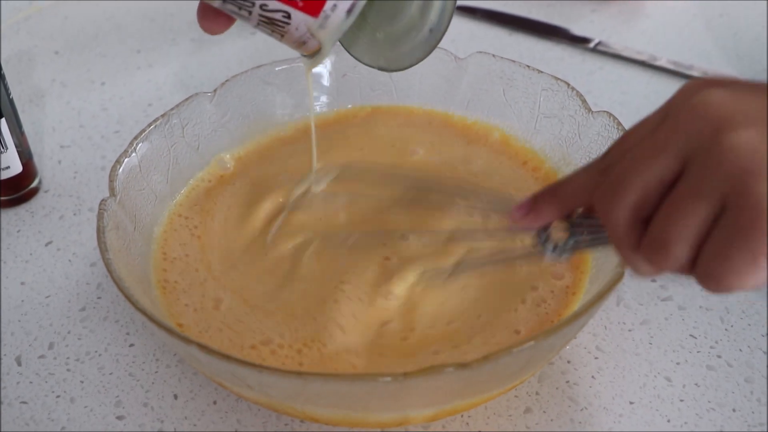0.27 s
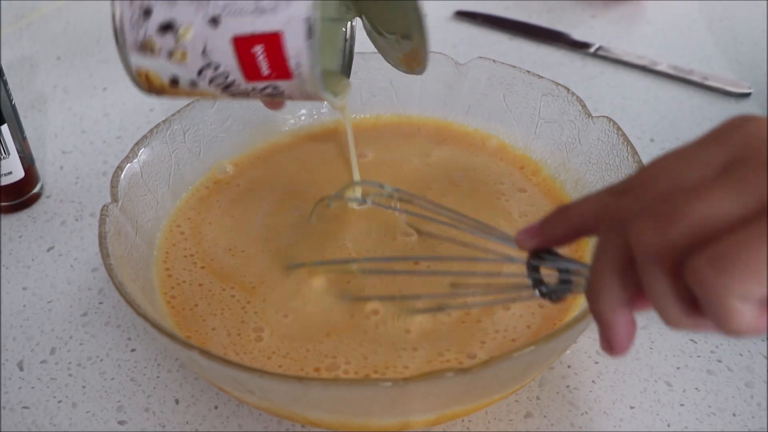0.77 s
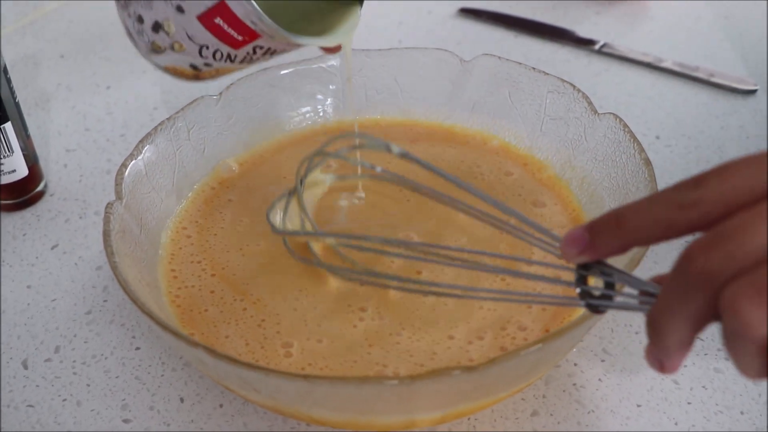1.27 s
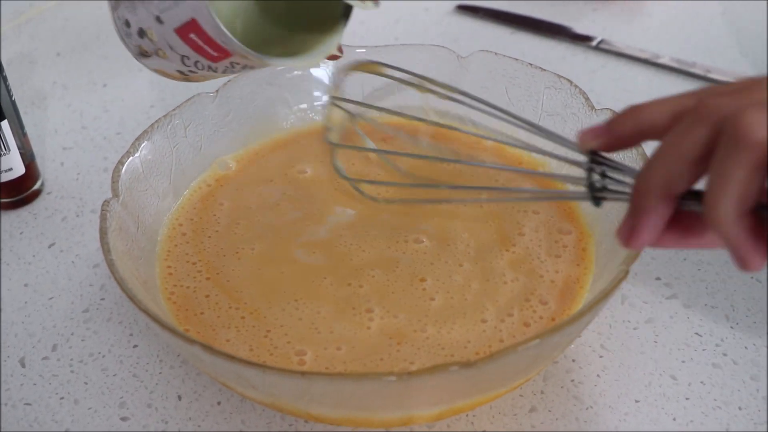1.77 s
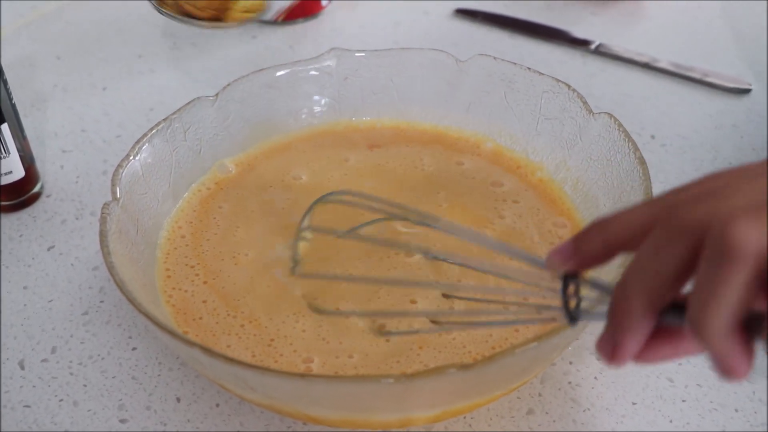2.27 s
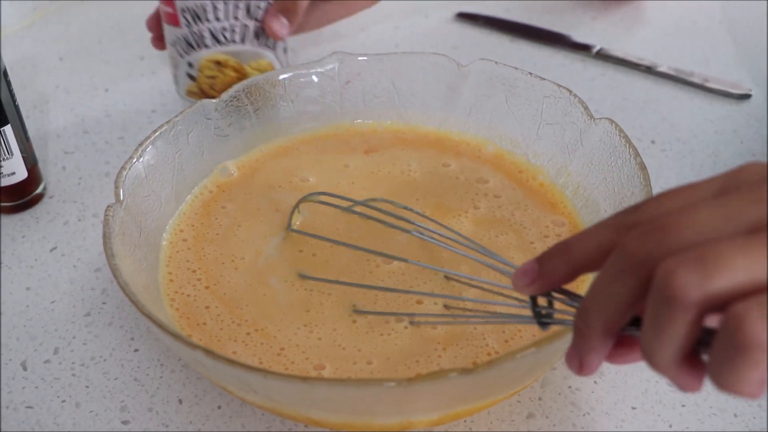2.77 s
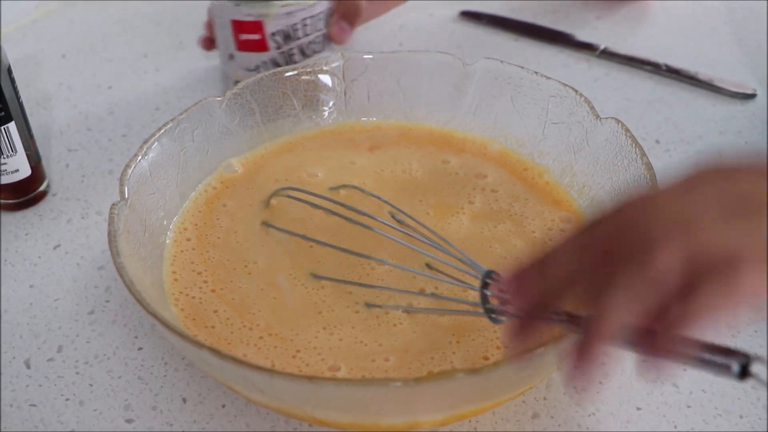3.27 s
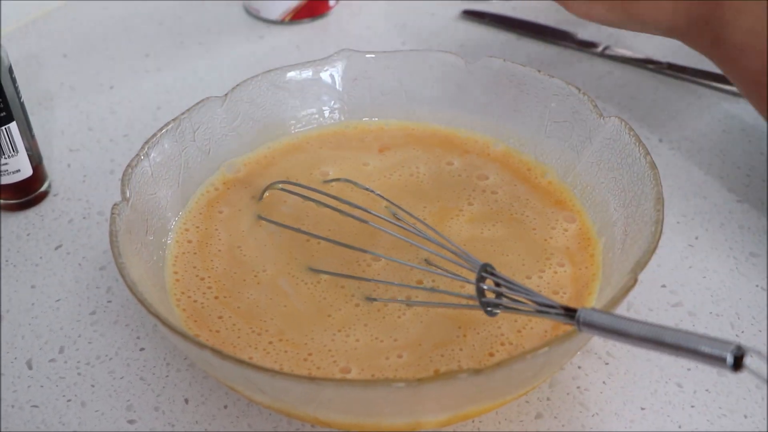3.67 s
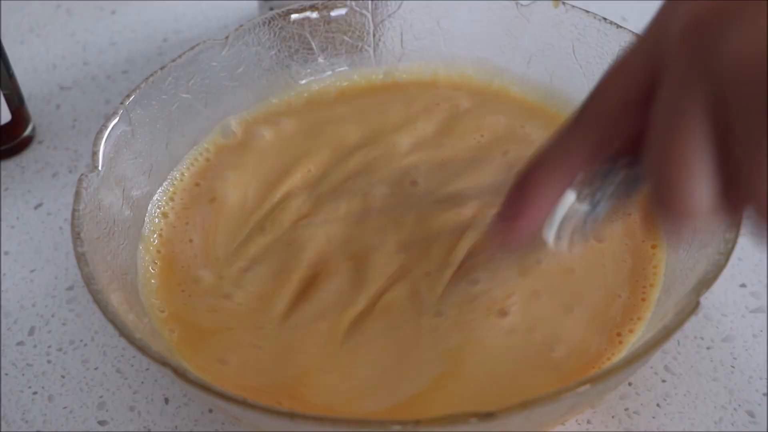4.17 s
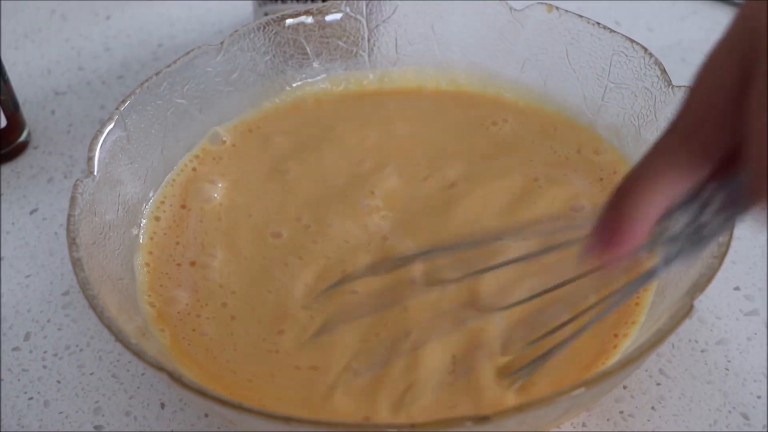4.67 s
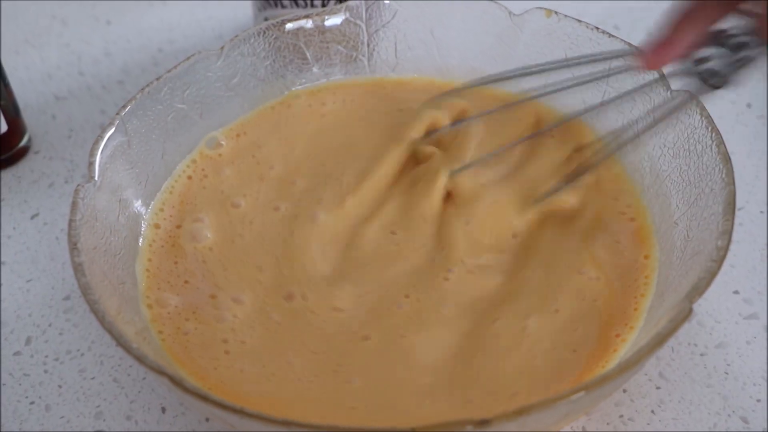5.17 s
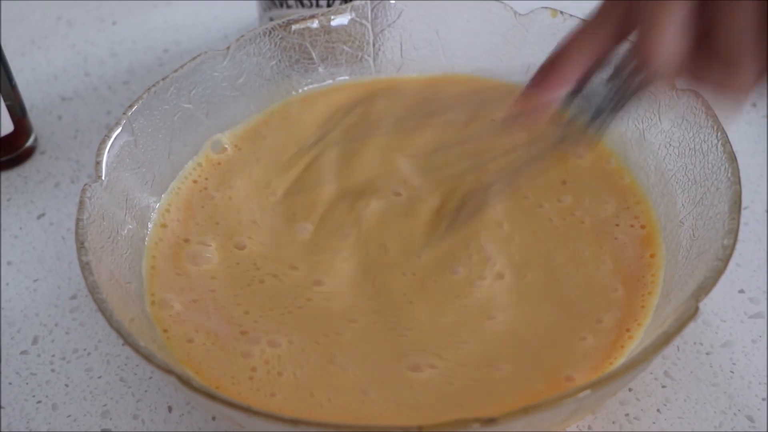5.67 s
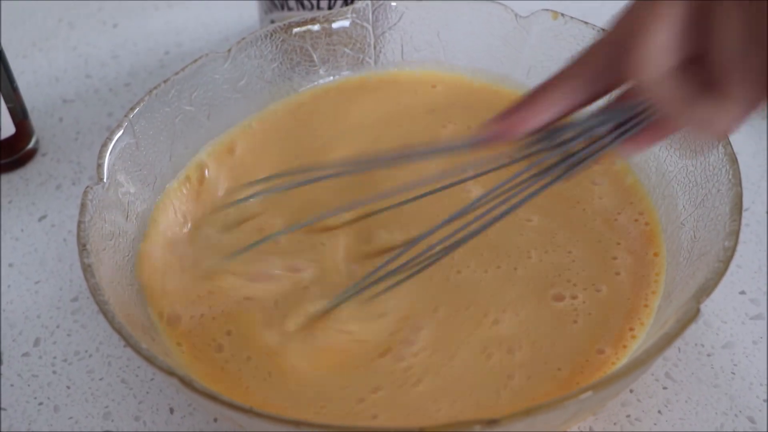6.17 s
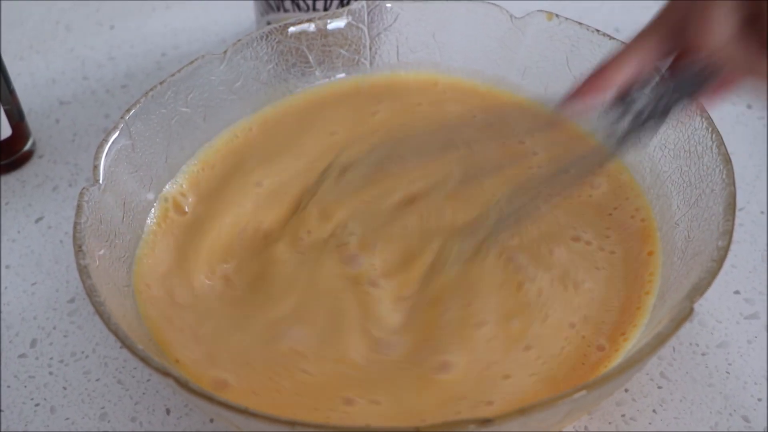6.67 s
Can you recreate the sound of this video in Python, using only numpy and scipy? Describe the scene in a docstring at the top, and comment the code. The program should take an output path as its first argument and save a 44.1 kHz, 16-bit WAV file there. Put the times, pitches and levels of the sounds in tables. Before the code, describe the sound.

A wire whisk ticks lightly around a glass bowl of liquid, close to a hand-held microphone in a kitchen. A can strikes the rim with a loud clink, a low handling thump follows, and the can rocks on the stone counter as the whisk is laid down. After a brief silence, brisk whisking rattles on the glass while the mixture sloshes and fizzes. A faint appliance hum lies underneath.

```python
"""A wire whisk ticks slowly round a glass bowl of eggs and condensed milk, close to a hand-held camera.
A can knocks the bowl and rocks on the stone counter, a little further off; the whisk is laid on the rim.
After a short silence comes brisk whisking: the wires rattle over the glass in runs of tiny slips,
the bowl thuds on the counter, and the mixture sloshes and fizzes as its bubbles ring.
Handling rumble, a faint appliance hum and the short echo of the kitchen lie underneath."""
import sys
import numpy as np
from scipy import signal
from scipy.fft import rfft, irfft
from scipy.io import wavfile

SR = 44100
rng = np.random.default_rng(int(sys.argv[2]) if len(sys.argv) > 2 else 0)


def digitize_waveform(pressure):
    """Quantize a signal to 16-bit integers and store it at the path in sys.argv[1].

    Rows of a 2-D input are taken as channels; values are limited to [-1, 1].
    """
    field = np.atleast_2d(pressure).T
    bounded = np.clip(field, -1, 1)
    quanta = np.round(bounded * 32767).astype(np.int16)
    wavfile.write(sys.argv[1], SR, quanta)


N = 305613

# Modes of the glass bowl, lowest first. Each row: pitch in Hz, relative level in dB, t60 in seconds.
GLASS_MODES = [(394.3, -16.5, 0.3), (781, 0.5, 0.25), (1007, 1.5, 0.23), (1760, 1.5, 0.27),
               (2680, -11.5, 0.2), (3720, -27, 0.37), (4890, -12.5, 0.065), (5000, -27.5, 0.19),
               (6330, -24.5, .11), (7980, -22, 0.12), (9650, -32.5, .14), (11200, -36, .08)]
# How alike the two microphones hear the scene. Each row: frequency in Hz, coherence from 0 to 1.
MIC_COHERENCE = [(130, 0.94), (500, 0.59), (1300, 0.47), (3000, 0.099), (12000, 0.03)]
RAP_S = 0.0049  # a plain rap of wire on glass; a longer contact is a drag


def amp(db):
    """Decibels to gain."""
    return 10 ** (np.asarray(db) / 20)


def unit(x):
    """Scales to rms 1."""
    return x / np.sqrt(np.mean(x ** 2) + 1e-20)


def sized(x, db):
    """Gives a sound the energy of 20 ms at this level."""
    return amp(db) * unit(x) * np.sqrt(.02 * SR / x.shape[-1])


def clock(size):
    """Times in seconds of so many samples."""
    return np.arange(size) / SR


def read(points, hz):
    """Reads a table on a log-frequency axis."""
    knots_hz, values = np.transpose(points)
    return np.interp(np.log(hz + 1), np.log(knots_hz + 1), values)


def follow(rows, column=1):
    """Gain over the whole scene from rows of seconds and dB."""
    rows = np.array(rows)
    return amp(np.interp(clock(N), rows[:, 0], rows[:, column]))


def smooth(x, seconds):
    """One-pole average with this time constant."""
    keep = np.exp(-1 / (seconds * SR))
    return signal.lfilter([1 - keep], [1, -keep], x)


def add(mix, start, sound):
    """Mixes a sound in at a start in seconds."""
    part = mix[:, max(round(start * SR), 0):][:, :sound.shape[-1]]
    part += sound[..., :part.shape[1]]


def noise(spectrum, size):
    """Noise shaped by rows of Hz and dB, alike at the two microphones in the bass."""
    hz = np.fft.rfftfreq(size, 1 / SR)
    left, other = rfft(rng.standard_normal((2, size)))
    coherence = read(MIC_COHERENCE, hz)
    right = coherence * left + np.sqrt(1 - coherence ** 2) * other
    return unit(irfft(np.array([left, right]) * amp(read(spectrum, hz)), size))


def colour(x, spectrum):
    """Minimum-phase filter shaped by rows of Hz and dB."""
    log_gain = np.log(amp(read(spectrum, abs(np.fft.fftfreq(2048, 1 / SR)))))
    taps = np.fft.ifft(np.exp(np.conj(signal.hilbert(log_gain)))).real[:1024]
    return signal.fftconvolve(x, taps[None], axes=1)[:, :x.shape[1]]


def ring(modes, size, pitch=1, scatter_db=0):
    """Dying modes; the higher ones reach the two microphones out of step."""
    hz, db, t60 = np.transpose(modes)[:, :, None]
    height, lag = rng.standard_normal((2, 2, len(modes), 1))
    phase = lag * np.sqrt(-np.log(read(MIC_COHERENCE, hz)))
    t = clock(size)
    fade = amp(db + scatter_db * height - 60 * t / t60)
    return (fade * np.sin(2 * np.pi * hz * pitch * t + phase)).sum(1)


def room_tone():
    """Still kitchen air and the faint hum of an appliance, drifting slowly in phase."""
    # The air. Each row: frequency in Hz, relative level in dB.
    air_spectrum = [(25, -18), (70, 3), (130, 1), (200, -7), (330, -2.5), (700, -10.5), (2000, -15.5),
                    (6000, -20.5), (15000, -29.5)]
    # The hum. Each row: pitch in Hz, level in dB.
    hum_tones = [(129.2, -62), (518, -62)]
    t, hum = clock(N), np.zeros(N)
    for hz, db in hum_tones:
        drift = 0.49 * rng.standard_normal() * np.sin(t)
        hum += amp(db) * unit(np.sin(2 * np.pi * hz * t + drift))
    return amp(-50) * noise(air_spectrum, N) + hum


def thump(hz, length, decay, size):
    """A soft push rings the counter and the camera body in a low band."""
    t = clock(size)
    band = [(hz / 5, -38), (hz / 2, -19), (hz * 0.79, 0), (hz, -6),
            (hz * 1.38, -9), (hz * 5, -28), (hz * 80, -66)]
    envelope = (1 - np.exp(-t / 0.0022)) * np.exp(-np.maximum(t - length, 0) / decay)
    return noise(band, size) * envelope


def rumble_and_thumps():
    """The camera sways in the hand with a rumble and a soft rustle; dull low thumps sound over it."""
    # The sway. Each row: time in seconds, level of rumble and rustle in dB.
    sway = [(0, -57), (1.1, -61.5), (1.47, -44), (1.8, -56.5), (3.5, -73.5), (4.2, -57.5)]
    # The rustle. Each row: frequency in Hz, relative level in dB.
    rustle_spectrum = [(200, -14.5), (800, 3.5), (2000, -2), (6000, -15), (16000, -37)]
    # Dull low thumps from camera handling, the can's knock and the bowl bouncing on the counter.
    # Each row: start in seconds, time before the decay in seconds, level in dB.
    thumps = [(0.492, 0.03, -34.5), (0.94, 0.0074, -27.5), (1.401, 0.069, -33), (2.004, 0.1, -9.5),
              (2.807, 0.091, -27.5), (5.928, 0.014, -26)]
    rumble = noise([(10, -11.0), (30, -7.5), (100, -18.5), (400, -69)], N)
    out = follow(sway) * (rumble + noise(rustle_spectrum, N))
    for start, length, db in thumps:
        add(out, start, sized(thump(hz=136.5, length=length, decay=0.059, size=14000), db))
    return out


def scrape(body, length, slips_per_s, bite=1):
    """A contact is a first bite and a run of tiny slips, each of which sounds the body."""
    t = clock(size=2560)
    chance, force = rng.random(len(t)), rng.standard_normal(len(t))
    pressure = np.sin(np.pi * np.minimum(t / length, 1))
    slips = force * (chance < slips_per_s / SR) * pressure
    slips[0] = bite
    return signal.fftconvolve(body, slips[None], axes=1)


def wire_contact(length, rattle_db, clack_db):
    """One wire on the wet glass: the loops rattle and the damped bowl clacks."""
    # Modes of the wire loops. Each row: pitch in Hz, relative level in dB, t60 in seconds.
    wire_modes = [(1280, 4.5, 0.03), (1400, 0.5, 0.041), (1980, -14.5, 0.11), (2680, 1.5, 0.01),
                  (3030, 0, 0.011), (3730, 0, 0.025), (5147, 7.5, 0.014), (5990, 2.5, 0.025)]
    # The bright rattle and the duller clack. Each row: frequency in Hz, relative gain in dB.
    rattle_spectrum = [(1500, -40.5), (2500, -16.5), (3400, 4), (6800, -7), (8200, -2.5), (12000, -11),
                       (16000, -18.5)]
    clack_spectrum = [(150, -22), (800, -11.5), (1250, -3), (1600, -2.5), (2200, 5), (3300, 0), (6000, -68)]
    t = clock(size=2560)
    snap = np.exp(-t / 0.0015) + 0.22 * np.exp(-t / 0.014)
    tick = noise([(100, 0.014), (16000, 0.0042)], len(t)) * snap
    loops = ring(wire_modes, len(t), pitch=1 + 0.026 * rng.standard_normal(), scatter_db=4.5)
    contact = scrape(sized(tick, 0) + sized(loops, -6), length, slips_per_s=3000,
                     bite=3.15 * RAP_S / length)
    rattle = sized(colour(contact, rattle_spectrum), rattle_db)
    clack = sized(colour(contact, clack_spectrum), clack_db)
    return rattle + clack


def bowl_bounce(db, size=12000):
    """The bowl thuds on the counter, at a new pitch each time, and its lowest mode rings on faintly."""
    # Modes of the bowl on the stone. Each row: pitch in Hz, relative level in dB, t60 in seconds.
    bounce_modes = [(116, 1.5, 0.22), (264.3, -4.5, 0.19)]
    detune, height = rng.standard_normal(2)
    onset = 1 - np.exp(-clock(size) / 0.00037)
    rock = onset * ring(bounce_modes, size, pitch=2 ** (0.13 * detune))
    deep = onset * ring(GLASS_MODES[:1], size, pitch=1 - 0.013 * abs(detune))
    thud = thump(hz=134, length=0.0066, decay=0.038, size=size)
    return sized(rock, db) + sized(thud, db - 7.5) + sized(deep, db - 21.5 - 0.5 * height)


def whisk(rattle_trim_db=-15, clack_trim_db=-2.5):
    """Each stroke lands the loops on the glass and bounces the bowl; light flicks fall between."""
    # The strokes. Each row: time in seconds, relative levels of rattle and of clack in dB.
    strokes = [(0.0569, -25.5, -38), (0.1393, -40, -39), (0.191, -30.5, -45), (0.3248, -27.5, -37.5),
               (0.5666, -30, -36), (0.651, -34.5, -40), (4.2035, -23.5, -37.5), (4.333, -28, -40),
               (4.3922, -28, -37), (4.5457, -17, -35), (4.6512, -18, -34), (4.7635, -28.5, -56),
               (4.8541, -22, -29.5), (4.9383, -26, -33), (5.0468, -25, -34), (5.0681, -17.5, -29.5),
               (5.1922, -14, -29), (5.2629, -15, -24), (5.3945, -17, -28.5), (5.5657, -19.5, -23.5),
               (5.7105, -20.5, -28.5), (5.7657, -27.5, -39), (5.8519, -23.5, -33), (5.9359, -21, -32),
               (6.0245, -13.5, -23), (6.15, -25, -35), (6.201, -20.5, -36), (6.2604, -13.5, -26),
               (6.4319, -26.5, -36), (6.5729, -28.5, -38.5), (6.6717, -29.5, -41)]
    # The wires drag when the whisk lies flat and rebound when it is beaten.
    # Each row: time in seconds, contact length in seconds.
    drag = [(0.3, 0.005), (0.57, 0.0036), (4.2, .02), (4.9, 0.017), (5.05, 0.0075), (5.57, .006),
            (6.26, 0.0056), (6.43, 0.014)]
    # The whisk presses the bowl down. Each row: time in seconds, bounce against clack in dB.
    press = [(0.7, -25), (4.2, -2.5), (5.3, -4.5), (5.95, -2), (6.26, -9), (6.5, 5.5)]
    # A single loop flicks the glass. Each row: start in seconds, relative level in dB.
    flicks = [(4.229, -27), (4.43, -22), (4.8225, -27.5), (4.974, -23.5), (5.286, -19.5), (5.428, -30),
              (5.601, -24), (5.6898, -26.5), (5.9862, -25.5), (6.068, -21.5), (6.374, -26), (6.4715, -21)]
    out = np.zeros((2, N))
    for time, rattle_db, clack_db in strokes:
        length = np.interp(time, *np.transpose(drag))
        press_db = np.interp(time, *np.transpose(press))
        drag_db = 2 * np.log2(length / RAP_S)  # a longer contact carries more energy
        rattle_db += rattle_trim_db + drag_db
        clack_db += clack_trim_db + .5 * drag_db
        start = time - .3 * (length - RAP_S)  # and begins a little early
        add(out, start, wire_contact(length, rattle_db, clack_db))
        add(out, start, bowl_bounce(clack_db + press_db))
    for start, db in flicks:
        add(out, start, amp(rattle_trim_db) * wire_contact(length=0.003, rattle_db=db, clack_db=db - 9))
    return out


def froth(beating, grains_per_s=2500, splash_db=-14, surge_db=5.0):
    """Tiny bubbles crackle in surges as the mixture churns, and in the wake of each stroke and slosh."""
    # The churning. Each row: time in seconds, fizz level in dB about which it surges.
    churn = [(0.35, -64), (1.0, -56), (3.9, -66.5), (4.17, -45), (4.8, -56.5), (5.5, -63), (6.92, -43)]
    # The fizz. Each row: frequency in Hz, relative gain in dB.
    fizz_spectrum = [(150, 7), (400, -17), (800, 0), (1400, 0), (4500, 0), (8000, -8.5), (16000, -22.5)]
    bursts = rng.random((2, N)) < grains_per_s / SR
    strength = amp(3.2 * np.minimum(rng.exponential(1, (2, N)), 4))
    grains = bursts * strength * rng.choice([-1, 1], (2, N))
    fizz = unit(colour(grains + 0.12 * grains[::-1], fizz_spectrum))  # some spill between microphones
    wake = np.sqrt(smooth((beating ** 2).mean(0) + 1e-14, seconds=0.028))
    knots = np.arange(0, N / SR, .02)
    surge = amp(surge_db * np.interp(clock(N), knots, rng.standard_normal(len(knots))))
    return (follow(churn) + amp(splash_db) * wake) * surge * fizz


def squeaks():
    """Light rubbing squeaks softly, swelling and fading, while can and whisk are moved about."""
    # The rubs. Each row: start in seconds, length in seconds, level in dB, factor on the pitch.
    rubs = [(0.675, 0.26, -38, 1), (2.201, 0.23, -36.5, 0.94), (2.47, 0.097, -42.5, 0.79)]
    # Their squeak. Each row: frequency in Hz, relative level in dB.
    squeak_spectrum = [(1400, -19.5), (2120, -2.5), (2500, -11), (3800, -21.5), (5600, -15), (7500, -25.5),
                       (16000, -38.5)]
    out = np.zeros((2, N))
    for start, length, db, pitch in rubs:
        swell = np.sqrt(np.hanning(int(length * SR)))
        squeak = noise([(hz * pitch, level) for hz, level in squeak_spectrum], size=16384)
        add(out, start, sized(squeak[:, :len(swell)] * swell, db))
    return out


def crack(size, decay):
    """The burst of noise in the first instant of a hard blow."""
    # The burst. Each row: frequency in Hz, relative level in dB.
    crack_spectrum = [(100, -18), (350, -9.5), (1300, 4), (2200, -11.5), (8000, -33.5), (16000, -51)]
    return noise(crack_spectrum, size) * np.exp(-clock(size) / decay)


def rim_clinks(size=14000, settle_s=3.388):
    """Can and whisk handle strike the rim; light steel wakes the higher modes of the glass."""
    # Metal on the rim. Each row: start in seconds, level in dB, treble tilt in dB,
    # contact length in seconds, time constant in seconds with which the resting steel mutes the glass.
    clinks = [(0.9377, -5.5, 3.5, 0.00021, 0.4), (2.33, -31.5, 21.5, 0.0068, 0.034),
              (2.422, -42.5, 23, 0.0032, 0.06), (2.752, -37, 24.5, 0.0059, 0.028),
              (3.387, -27, 10.5, 0.0054, 0.016), (3.395, -31, 14, 0.006, 0.008)]
    out = np.zeros((2, N))
    for start, db, bright_db, length, mute_s in clinks:
        glass = sized(ring(GLASS_MODES, size), 0)
        impact = sized(crack(size, decay=0.005), 1.5 + 0.8 * db)  # a harder blow cracks more
        blow = (glass + impact) * np.exp(-clock(size) / mute_s)
        tilt = [(600, -.5 * bright_db), (1750, 0), (5000, bright_db)]
        add(out, start, sized(colour(scrape(blow, length, slips_per_s=600), tilt), db))
    # The weight of the whisk comes down, rocks the bowl and wakes its lowest mode.
    add(out, settle_s, bowl_bounce(db=-31.5) + sized(ring(GLASS_MODES[:1], size=12000), db=-30.5))
    return out


def can():
    """The empty can knocks the bowl, lands and rocks on the stone, and hisses and rings as it slides."""
    # Modes of the tin. Each row: pitch in Hz, relative level in dB, t60 in seconds.
    tin_modes = [(755, 2.5, 0.066), (774, -1.5, 0.062), (1071, -16, 0.049), (1211, 2.5, 0.023),
                 (2310, -8.5, 0.035), (3550, -22.5, 0.034)]
    # The knocks. Each row: start in seconds, level of the ring in dB, factor on the pitch.
    knocks = [(0.9378, -19, 1.3), (3.029, -7.5, 1.01), (3.0986, -14.5, 1.112), (3.3, -32.5, 1.116)]
    # The slide. Each row: time in seconds, relative levels of hiss and of ringing tin in dB.
    slide = [(2.85, -54, -62), (2.921, -41, -46), (3.01, -58, -73), (3.155, -59, -32.5), (3.203, -33, -48),
             (3.29, -40.5, -29), (3.381, -47, -41.5)]
    out = np.zeros((2, N))
    for start, db, pitch in knocks:
        tin = sized(ring(tin_modes, 8192, pitch), db)
        add(out, start, tin + sized(crack(8192, decay=0.0027), db - 5))
    start, end = slide[0][0], slide[-1][0]
    contact = np.interp(clock(N), [start, start + 0.018, end - .02, end], [0, 1, 1, 0])
    friction = rng.standard_normal((1, N))
    drone = unit(signal.fftconvolve(friction, ring(tin_modes, 4700, pitch=1.11), axes=1)[:, :N])
    drone *= amp(-1.5) * follow(slide, column=2)
    # Tin hissing over stone. Each row: frequency in Hz, relative level in dB.
    hiss_spectrum = [(3100, -8), (4200, -0.5), (5200, 0), (6400, -11), (9300, -10), (16000, -30)]
    hiss = amp(1.0) * follow(slide) * noise(hiss_spectrum, N)
    return out + contact * (hiss + drone)


def bubble(hz, decay, rise=0.048):
    """An air pocket rings, rising in pitch as it nears the surface."""
    t = clock(size=1024)
    turns = hz * np.cumsum(1 + rise * np.minimum(t / decay, 4)) / SR
    lag = rng.standard_normal((2, 1)) * hz / 3000
    return np.sin(2 * np.pi * turns + lag) * (1 - np.exp(-3 * t / decay)) * np.exp(-t / decay)


def liquid(cloud_bubbles=90, blips_per_s=40, blip_decay_s=.0016, brisk_s=(4.17, 6.93)):
    """Brisk whisking sloshes up clouds of bubbles; large ones pop amid a few fainter ones and small ones blip
    at random."""
    # The wires tear through the mixture.
    # Each row: start in seconds, length in seconds, relative level in dB, middle bubble pitch in Hz.
    sloshes = [(4.274, 0.04, -29.5, 660), (4.454, 0.036, -33, 425), (4.844, 0.061, -23, 974),
               (5.106, 0.042, -25, 1266), (5.844, 0.055, -27.5, 1035), (6.806, 0.06, -35, 1050)]
    # Single air pockets burst. Each row: start in seconds, relative level in dB, pitch in Hz.
    pops = [(5.793, -33.5, 1990), (6.079, -33, 1394), (6.284, -36.5, 1350), (6.863, -37, 1810)]
    out = np.zeros((2, N))
    for start, length, db, hz in sloshes:
        cloud = np.zeros((2, 8192))
        delays = length * rng.random(cloud_bubbles)
        for delay, detune, height in zip(delays, *rng.standard_normal((2, cloud_bubbles))):
            bubble_hz = hz * 2 ** np.clip(0.897 * detune, -2, 2)
            gain = amp(1.1 * height) * np.sqrt(bubble_hz / hz)
            add(cloud, delay, gain * bubble(bubble_hz, decay=2.2 / bubble_hz, rise=0.075))
        add(out, start, sized(cloud, db - 3.5))
    for start, db, hz in pops:
        add(out, start, sized(bubble(hz, decay=0.0026, rise=0.027), db + 0.5))
        for offset, detune in rng.uniform(-0.9, 1, (5, 2)):  # fainter bubbles break around it
            neighbour = bubble(hz * 2 ** (0.74 * detune), blip_decay_s)
            add(out, start + 0.0093 * offset, sized(neighbour, db - 12))
    blip_times = brisk_s[0] + np.cumsum(rng.exponential(1, size=200)) / blips_per_s
    for start in blip_times[blip_times < brisk_s[1]]:
        detune, height = rng.standard_normal(2)
        blip = bubble(hz=2000 * 2 ** (.5 * detune), decay=blip_decay_s, rise=0.014)
        add(out, start, sized(blip, db=-51 + 2 * height))
    return out


def hollow_tone(start_s=6.14, length_s=.3, db=-34):
    """A low, wavering tone swells and fades at the deepest mode of the bowl."""
    out = np.zeros((2, N))
    swell = np.sqrt(np.hanning(int(length_s * SR)))
    tone = signal.fftconvolve(rng.standard_normal((1, SR)), ring(GLASS_MODES[:1], size=12000), axes=1)
    add(out, start_s, sized(tone[:, :len(swell)] * swell, db))
    return out


def kitchen_echo(x):
    """The room answers with a dense tail in which each band dies at its own speed."""
    # Decay of the kitchen. Each row: frequency in Hz, t60 in seconds.
    room_t60 = [(120, 0.5), (4000, 0.3552), (12000, 0.07)]
    # Strength of its echo. Each row: frequency in Hz, level in dB.
    room_db = [(120, -6), (800, -3.5), (2500, -9), (12000, -8)]
    hz, t, bands = signal.stft(noise([(100, 0.0013), (16000, 0.033)], 24000), SR, nperseg=256)
    fade = amp(-60 * t / read(room_t60, hz)[:, None])
    fade *= amp(read(room_db, hz))[:, None] / np.sqrt((fade ** 2).mean(1, keepdims=True))
    tail = signal.istft(bands * fade, SR, nperseg=256)[1]
    tail *= (1 - np.exp(-clock(tail.shape[1]) / 0.00019)) / np.sqrt(tail.shape[1])
    return signal.fftconvolve(x, tail, axes=1)[:, :N]


def limiter(x, threshold_db=-4.5, attack_s=0.016, recover_db_per_s=171.5):
    """Ducks a moment after a loud knock and recovers while it rings."""
    fall = recover_db_per_s * clock(N)
    peak_db = 20 * np.log10(abs(x).max(0) + 1e-9)
    held_db = np.maximum.accumulate(peak_db + fall) - fall
    over_db = np.maximum(held_db - threshold_db, 0)
    return x * amp(-smooth(over_db, attack_s))


def scene():
    """The kitchen from the camera: the bowl close and a little to the left, the can further off."""
    beating = whisk() + liquid()
    bowl = beating + froth(beating) + rim_clinks() + squeaks() + hollow_tone()
    low_cut = signal.butter(2, 70, "high", fs=SR, output="sos")  # the sounds of bowl and can are thinned below 70 Hz
    near, far = signal.sosfilt(low_cut, [bowl, can()])
    echo = kitchen_echo(near + amp(2) * far)  # more of the can's sound comes by way of the room
    counter_pan, rumble_pan = amp([[.4], [-.4]]), amp([[1.4], [-1.8]])
    return (near + far + echo) * counter_pan + rumble_and_thumps() * rumble_pan + room_tone()


def record(dry, silence_s=(3.947, 4.164), top_hz=16000):
    """The loudest knocks duck and softly overload, the sound drops out briefly, the top treble is cut."""
    t = clock(N)
    live = (t < silence_s[0]) | (t > silence_s[1])
    ducked = limiter(dry)
    saturated = ducked / (1 + ducked ** 6) ** (1 / 6)
    low_pass = signal.firwin(511, top_hz, window=("kaiser", 9), fs=SR)
    return signal.oaconvolve(saturated * live, low_pass[None], "same")


dry = scene()
out = record(dry)
digitize_waveform(out)
```